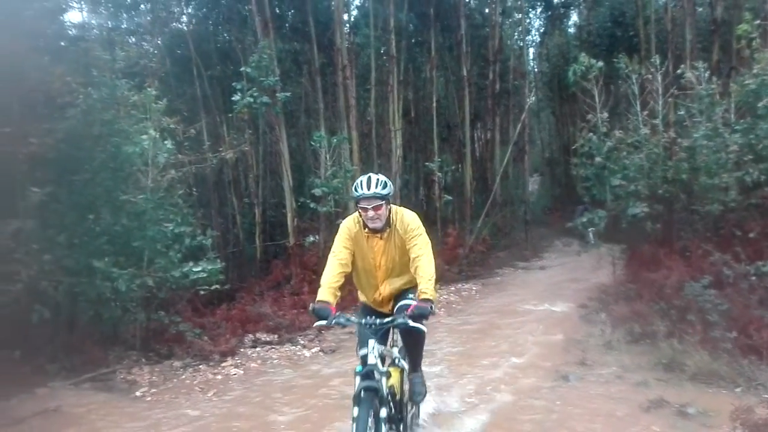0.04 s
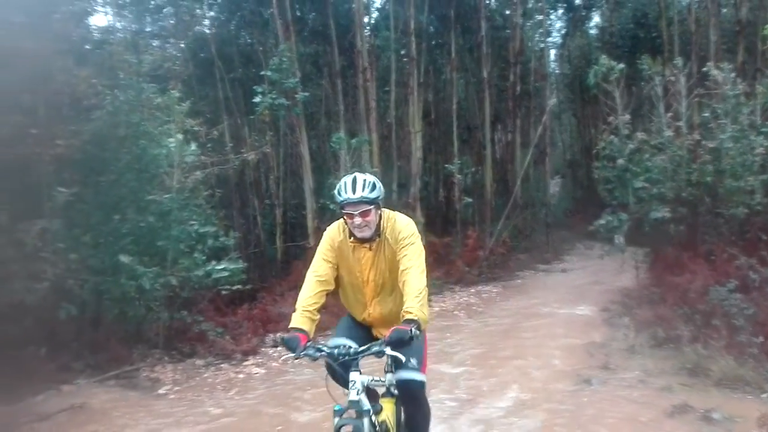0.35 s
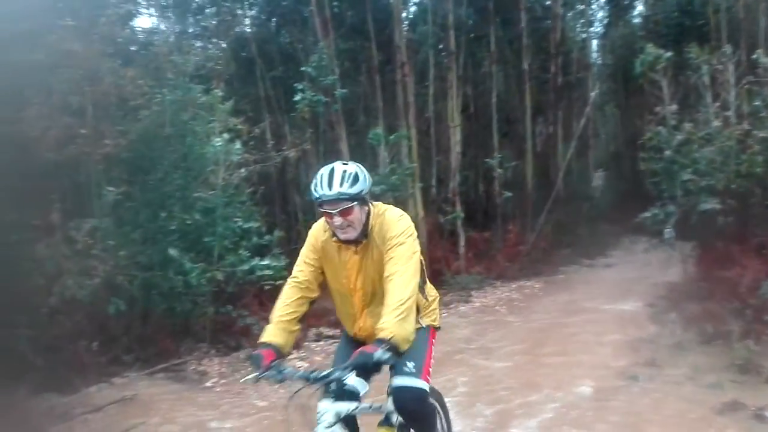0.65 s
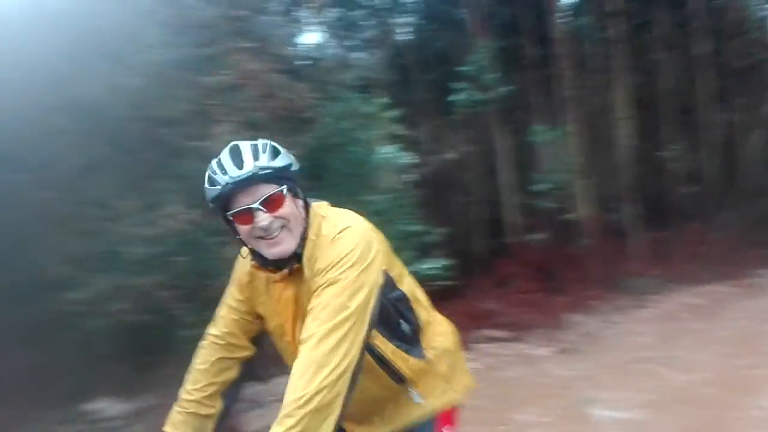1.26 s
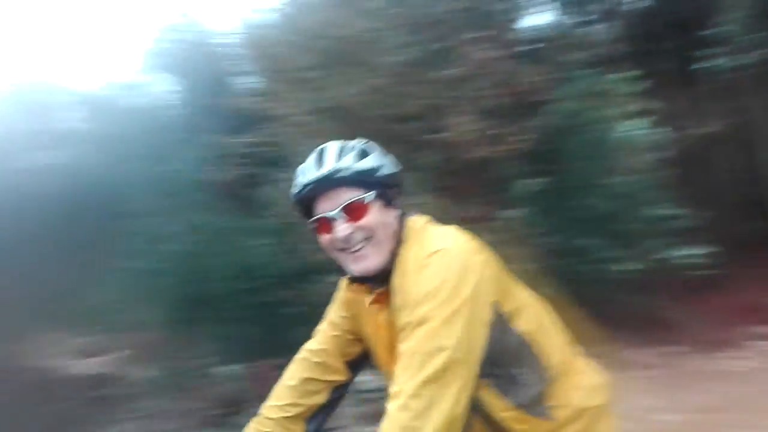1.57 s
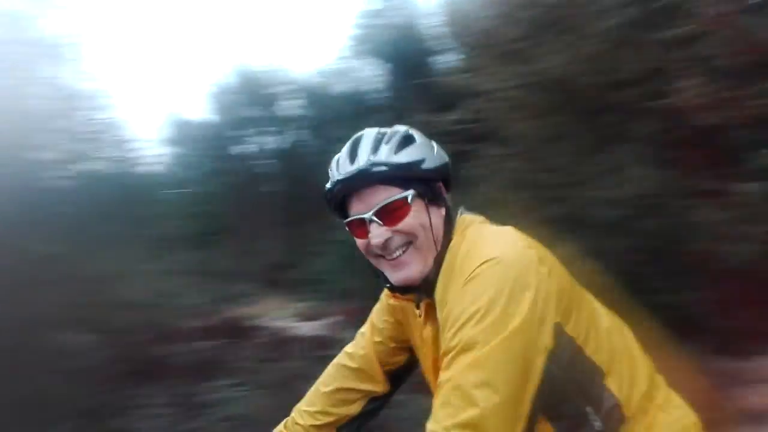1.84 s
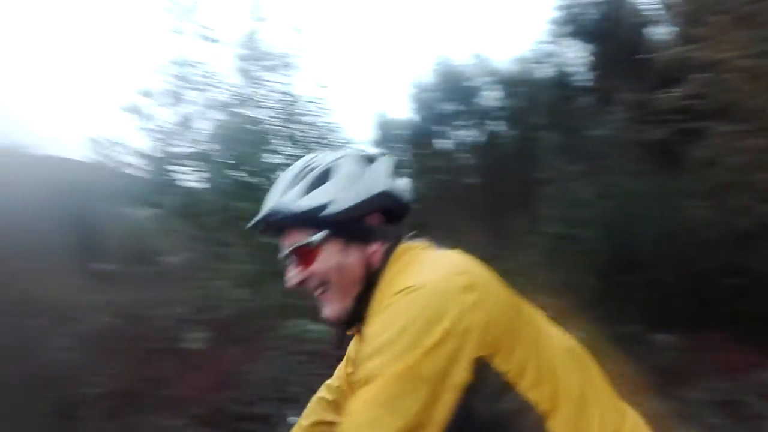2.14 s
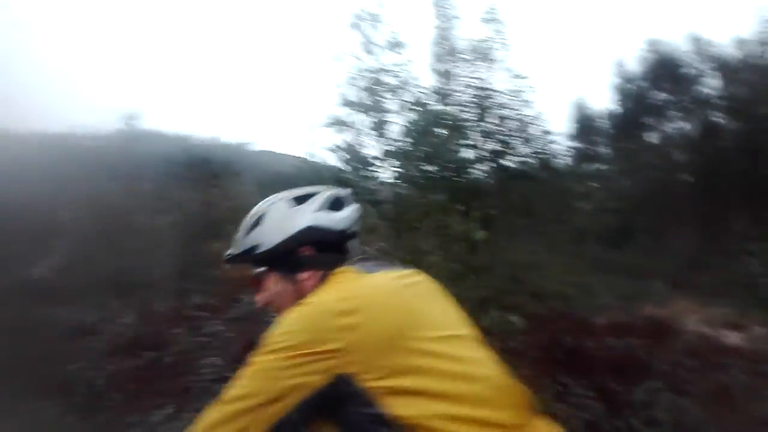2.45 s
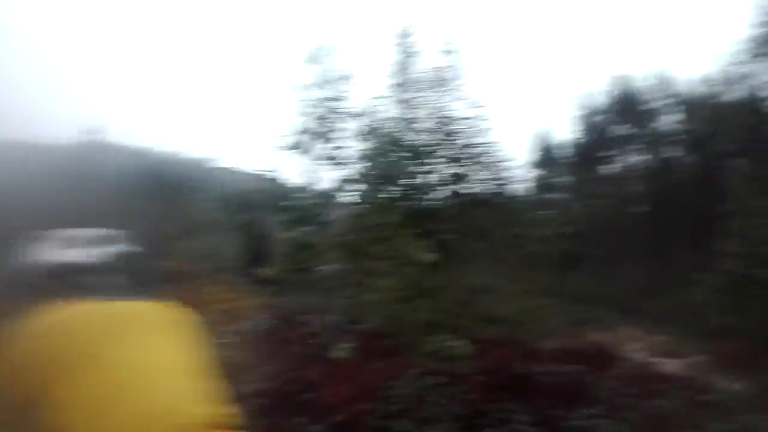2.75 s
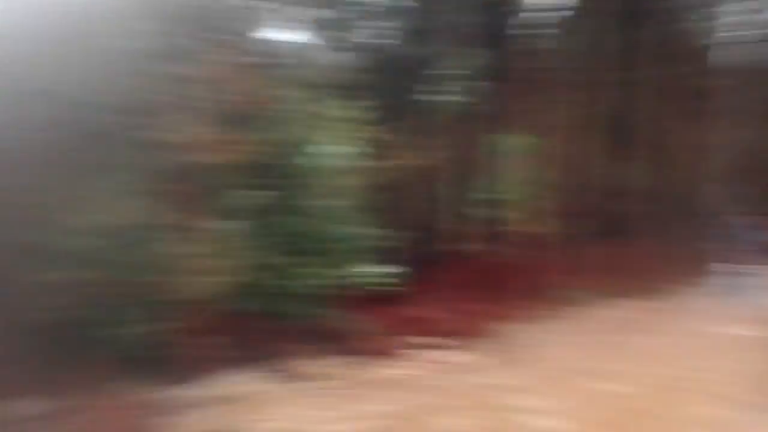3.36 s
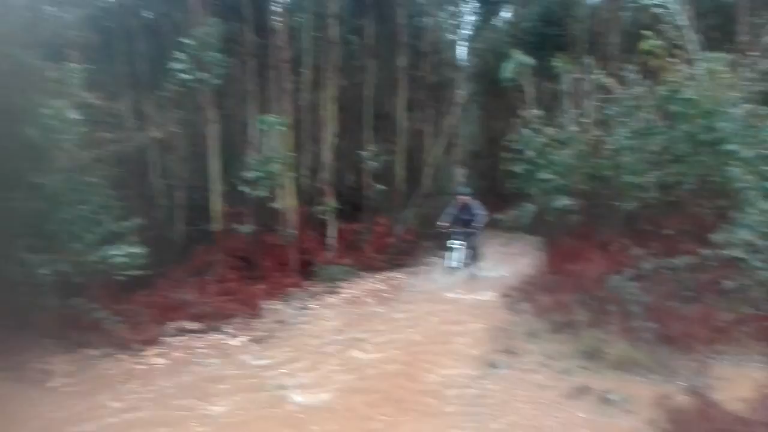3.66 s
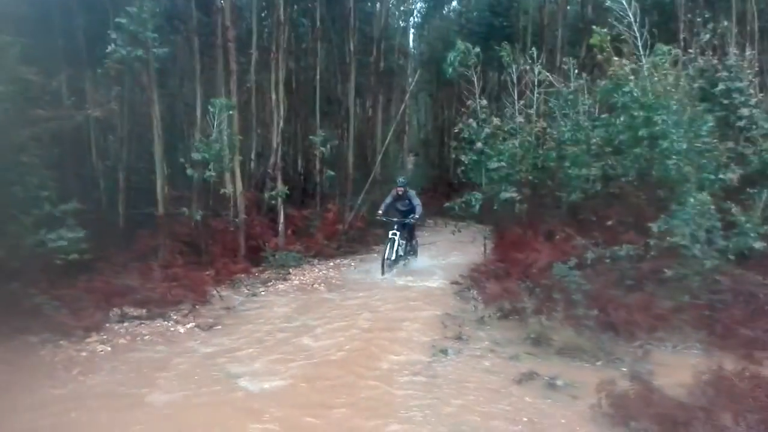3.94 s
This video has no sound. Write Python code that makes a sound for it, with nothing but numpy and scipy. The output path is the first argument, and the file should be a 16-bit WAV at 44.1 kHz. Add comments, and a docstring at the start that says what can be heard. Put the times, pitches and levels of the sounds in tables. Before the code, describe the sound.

A mountain bike rolls closer on a wet forest track, tyres crunching and hissing, with small squelches and splashes of mud. It is loudest from about 1.4 to 2.9 seconds, with a low rumble as it passes, and fades by 3.5. Dull knocks bump the microphone throughout, and a few loud, sharp clicks hit at around 3.2 to 3.4 seconds. Light wind rumble and soft forest ambience continue underneath.

```python
"""Mountain bike on a muddy track

A bike rolls close past a hand-held camera in a wet forest. Its tyres crunch through grit, hiss
and squelch, throwing fine spray when nearest, then rumble away. Soft bumps and a few sharp
clicks knock on the camera, over forest wash and light wind on the microphone."""
import sys
import numpy as np
from scipy import signal
from scipy.fft import rfft, irfft, next_fast_len
from scipy.io import wavfile
from scipy.ndimage import uniform_filter1d, map_coordinates

SR = 44100
rng = np.random.default_rng(int(sys.argv[2]) if len(sys.argv) > 2 else 0)


def digitize_waveform(pressure):
    """Quantize a signal to 16-bit integers and store it at the path in sys.argv[1].

    Rows of a 2-D input are taken as channels; values are limited to [-1, 1].
    """
    field = np.atleast_2d(pressure).T
    bounded = np.clip(field, -1, 1)
    quanta = np.round(bounded * 32767).astype(np.int16)
    wavfile.write(sys.argv[1], SR, quanta)


N = 176400
TIME_S = np.arange(N) / SR


def amp(db):
    """Decibels to gain."""
    return 10 ** (np.asarray(db) / 20)


def unit(x):
    """Scaled to rms 1."""
    return x / np.sqrt(np.mean(x ** 2) + 1e-20)


def along(points, hz):
    """A curve read on a log frequency axis."""
    freqs, values = np.transpose(points)
    return np.interp(np.log(hz + 1), np.log(freqs + 1), values)


def automation(rows):
    """One value per sample for each column after the time."""
    times, *columns = np.transpose(rows)
    return [np.interp(TIME_S, times, column) for column in columns]


def wobble(rate_hz):
    """A smooth curve through rate_hz random points a second."""
    return map_coordinates(rng.standard_normal(2048), [np.arange(N) * rate_hz / SR], mode="wrap")


def filtered(x, response):
    """x through an EQ given as gain against frequency."""
    size = next_fast_len(N + SR // 2)
    return irfft(rfft(x, size) * response(np.fft.rfftfreq(size, 1 / SR)), size)[..., :N]


def noise(patchy_db):
    """Two unrelated noises with brief patches of random gain."""
    spectra = signal.stft(rng.standard_normal((2, N)), nperseg=256)[2]
    patches = uniform_filter1d(rng.standard_normal(spectra.shape[1:]), size=6, axis=0)
    patches = unit(uniform_filter1d(patches, size=5, axis=1))
    return unit(signal.istft(spectra * amp(patchy_db * patches), nperseg=256)[1][:, :N])


def grains(count, low_hz, high_hz, cycles, spread_db):
    """Two unrelated streams of tiny damped rings: grit and bursting films of water."""
    t, out = np.arange(256) / SR, []
    for when, pitch, size, phase in rng.random((2, 4, count, 1)):
        hz = low_hz + (high_hz - low_hz) * pitch
        gain = amp(-spread_db * np.log(np.maximum(size, .004))) * np.sqrt(hz)
        rings = gain * np.sin(2 * np.pi * (hz * t + phase)) * np.exp(-np.log(1000) * hz * t / cycles)
        at = (when * N).astype(int) + np.arange(len(t))
        out.append(np.bincount(at.ravel(), rings.ravel(), N)[:N])
    return unit(np.array(out))


# Stereo image: freq_hz, left_right_correlation
STEREO_IMAGE = [(3400, 1), (3900, 1), (4600, 1), (5600, 0.84), (7500, .56), (13000, .4)]
MONO_BELOW_HZ = STEREO_IMAGE[0][0]


def coloured(pair, eq):
    """EQ two signals into stereo, mid at rms 1: mono in the bass, wide in the treble."""
    def response(hz):
        width = np.tan(np.arccos(along(STEREO_IMAGE, hz)) / 2) * (hz > MONO_BELOW_HZ)
        return amp(along(eq, hz)) * [np.ones_like(hz), width]
    mid, side = filtered(pair, response)
    return np.array([mid + side, mid - side]) / np.std(mid)


def passing(peak_s, half_width_s):
    """Gain that swells and fades as the bike goes by."""
    return 1 / np.sqrt(1 + ((TIME_S - peak_s) / half_width_s) ** 4)


def spurt(peak_s, half_width_s):
    """Bell-shaped envelope of a burst of liquid."""
    return np.exp(-2 * ((TIME_S - peak_s) / half_width_s) ** 2)


# Gritty midrange: freq_hz, gain_db
CRUNCH_EQ = [(260, -27), (450, -30), (580, -17.5), (664, -12.5), (934, -7.5), (1050, -5), (1350, -2),
             (2580, -10.5), (3000, -14), (3900, -17), (6600, -120)]


def crunch(level_db, trim_db=1):
    """Grit grinds under the tread: rough noise dotted with tiny ticks."""
    bed = noise(patchy_db=-2.5)
    grit = grains(count=5000, low_hz=617, high_hz=3210, cycles=11.7, spread_db=2)
    gain = amp(level_db + trim_db + 1.03 * wobble(rate_hz=70))
    return gain * coloured(bed + amp(-11 + 1) * grit, CRUNCH_EQ)


# Wet sizzle with the bike ahead, then from alongside onward: freq_hz, gain_db
HISS_AHEAD_EQ = [(1410, -35), (2400, -7), (2590, -8), (2910, -0.5), (3210, -4), (4050, 0.5), (4670, -2.5),
                 (5260, -4), (6530, -4), (7580, -0.5), (10200, -9.5), (12700, -13.5), (14300, -17)]
HISS_ALONGSIDE_EQ = [(1410, -14), (2400, -12.5), (2610, -4.5), (4810, -0.5), (5840, -4), (7090, -0.5),
                     (9480, -10.5), (11400, -11.5), (13100, -15.5), (14300, -27.5)]


def hiss(level_db, trim_db=1.5, crossfade_s=0.81, half_width_s=0.53):
    """Water films burst under the tread; the hiss changes colour as the bike draws level."""
    bed = noise(patchy_db=1.9)
    bursts = grains(count=12000, low_hz=2210, high_hz=13600, cycles=6.3, spread_db=4)
    water = bed + amp(-11) * bursts
    blend = .5 + .5 * np.tanh((TIME_S - crossfade_s) / half_width_s)
    wet = blend * coloured(water, HISS_ALONGSIDE_EQ) + (1 - blend) * coloured(water, HISS_AHEAD_EQ)
    return amp(level_db + trim_db + 0.4 * wobble(rate_hz=200)) * wet


# Airy top end: freq_hz, gain_db
SPRAY_EQ = [(6000, -30), (9500, -3), (11200, 13), (14000, -3)]


def spray(ground_db):
    """The finest spray, heard while the bike is nearest."""
    gain = amp(-47.5 + ground_db + wobble(rate_hz=25)) * passing(peak_s=2.2, half_width_s=.62)
    return gain * coloured(noise(patchy_db=2), SPRAY_EQ)


# Low body of the tyres: freq_hz, gain_db
TREAD_EQ = [(70, -19), (150, -1.5), (250, 0.5), (380, 5.5), (520, -3.5), (900, -16), (2000, -60)]


def tread(ground_db):
    """The tread rumbles most from behind, just after the pass."""
    gain = amp(-43 + ground_db) * passing(peak_s=2.51, half_width_s=0.59)
    return gain * coloured(noise(patchy_db=-0.8), TREAD_EQ)


# Fader moves of the pass, before trims: time_s, crunch_db, hiss_db
TYRE_FADERS = [(0.0, -44, -41), (0.2, -42, -40.5), (0.54, -38, -37.5), (0.82, -39, -37),
               (0.93, -33.5, -35.5), (1.01, -38.5, -34.0), (1.09, -33.5, -34.5), (1.29, -37.5, -35.5),
               (1.42, -30.5, -29), (1.5, -34, -32.5), (1.62, -32, -30.5), (1.96, -30.5, -28.5),
               (2.2, -32, -30), (2.4, -29.5, -28.5), (2.56, -31.5, -29), (2.84, -31, -32),
               (2.92, -35, -36.5), (3.12, -36.0, -37.5), (3.42, -42, -45), (3.6, -46.5, -57),
               (3.98, -46.5, -52.5)]


def tyres():
    """Rolling tyres; uneven ground shakes all four layers together."""
    crunch_db, hiss_db = automation(TYRE_FADERS)
    ground_db = .6 * wobble(rate_hz=40)
    contact = crunch(crunch_db + ground_db) + hiss(hiss_db + ground_db)
    return contact + spray(ground_db) + tread(ground_db)


# Ambience bed: freq_hz, gain_db
FOREST_EQ = [(110, -27), (180, -36), (290, -3.5), (403, -9), (433, -8), (493, -5.5), (685, -3), (853, -4),
             (1040, 1), (1840, -6.5), (2860, -13.5), (3130, -7), (5320, -25), (7000, -6), (11300, -25),
             (14300, -41)]


def forest():
    """The soft, steady wash of the forest."""
    return amp(-43.5 + 0.31 * wobble(rate_hz=10)) * coloured(noise(patchy_db=2.7), FOREST_EQ)


# Wind rumble and the sub-bass buffeting under it: freq_hz, gain_db
RUMBLE_EQ = [(12, -25), (20, 1), (32, -5.5), (59, 0.5), (144, 0.5), (199, -10), (260, -13), (340, -42),
             (570, -120)]
BUFFET_EQ = [(6, -10), (14, -2.5), (32, -13), (70, -19), (200, -60)]
# Gusts: time_s, rumble_offset_db, buffet_db
WIND_FADERS = [(0, -2.5, -47), (.8, -1, -45), (1.7, 2.5, -44), (2.2, -7, -47.5), (3.3, -1, -50),
               (3.65, -16, -36), (4, -4.5, -44.5)]


def wind():
    """A light breeze rumbles and buffets on the microphone."""
    offset_db, buffet_db = automation(WIND_FADERS)
    rumble_gain = amp(-42.5 + offset_db + 1.6 * wobble(rate_hz=11))
    rumble = coloured(noise(patchy_db=0.7), RUMBLE_EQ)
    top_hz = BUFFET_EQ[-1][0]
    buffet = filtered(rng.standard_normal(N), lambda hz: amp(along(BUFFET_EQ, hz)) * (hz < top_hz))
    return rumble_gain * rumble + amp(buffet_db) * unit(buffet)


def ring(t, hz, t60_s):
    """A damped sine."""
    return np.sin(2 * np.pi * hz * t) * np.exp(-np.log(1000) * t / t60_s)


# Dull knocks on the camera: start_s, peak_db, pitch_hz, t60_s, thud_mix_db
BUMP_CUES = [(0.0556, -24.5, 240, 0.012, -21), (0.085, -20, 195, 0.012, -11), (.605, -19, 195, .02, -1),
             (.637, -26.5, 236, 0.025, -24), (.921, -24.5, 190, 0.012, -10), (1.068, -27, 225, 0.019, -10),
             (1.498, -27.5, 300, 0.022, -17), (1.541, -22.5, 220, 0.016, -13),
             (1.715, -28, 180, 0.022, -12), (1.7763, -12, 333, 0.02, -45), (2.478, -27, 365, .025, -25),
             (2.52, -26, 220, 0.017, -15), (2.7052, -22.5, 245, 0.012, -11), (2.828, -31, 327, 0.021, -31),
             (3.112, -26, 242, 0.022, -4), (3.279, -31, 263, 0.018, -26), (3.3564, -14, 253, 0.013, -18),
             (3.798, -33, 264, 0.018, -17), (3.825, -24, 254, 0.01, -11)]


def bumps(attack_s=0.00084):
    """Each knock gives a dull ring of a few cycles over a deeper thud; hard ones have an edge."""
    out, t = np.zeros(N + SR), np.arange(SR // 8) / SR
    for start_s, peak_db, pitch_hz, t60_s, thud_mix_db in BUMP_CUES:
        thud = amp(thud_mix_db) * ring(t, hz=119, t60_s=0.028)
        edge = amp(peak_db + 6) * ring(t, hz=860, t60_s=0.0097)
        knock = (ring(t, pitch_hz, t60_s) + thud + edge) * (1 - np.exp(-t / attack_s))
        out[round(start_s * SR):][:len(t)] += amp(peak_db) * knock / np.abs(knock).max()
    return out[:N]


# Flicks of thin mud: peak_s, level_db, half_width_s
SPLASH_CUES = [(0.3, -44, .06), (.545, -38, .04), (0.632, -29, .003), (1.428, -32, .014), (2.315, -28, .03),
               (2.812, -32, .035)]
# Droplet sparkle: freq_hz, gain_db
SPLASH_EQ = [(1800, -25), (3500, -4), (5500, -6), (7500, 3), (10000, -5.5), (14000, -11)]


def splashes():
    """Thin mud scatters in bright spurts of fine droplets."""
    flow = sum(amp(level_db) * spurt(peak_s, width_s) for peak_s, level_db, width_s in SPLASH_CUES)
    droplets = grains(count=12000, low_hz=3000, high_hz=12900, cycles=7.6, spread_db=1)
    return flow * coloured(droplets, SPLASH_EQ)


# Mud squelches: peak_s, level_db, pitch_hz, half_width_s
SQUELCH_CUES = [(.46, -35, 1590, 0.02), (0.67, -35, 1180, .025), (0.868, -36, 1230, .025),
                (1.435, -30.5, 1400, 0.022), (2.424, -26, 1420, 0.012)]


def squelches(band_ratio=0.31):
    """A tyre presses into mud, squeezing out short, hollow spurts of water."""
    out = np.zeros(N)
    for peak_s, level_db, pitch_hz, half_width_s in SQUELCH_CUES:
        band = lambda hz: 1 / (1 + ((hz / pitch_hz - 1) / band_ratio) ** 2) ** 2
        hollow = unit(filtered(rng.standard_normal(N), band))
        out += amp(level_db) * hollow * spurt(peak_s, half_width_s)
    return out


def resonance(hz, pitch_hz, width_hz):
    """The response of one damped mode."""
    return 1j * hz * width_hz / (pitch_hz ** 2 - hz ** 2 + 1j * hz * width_hz)


# Ring of the camera's case: pitch_hz, width_hz, gain_db
CASE_MODES = [(1770, 760, -3.5), (3300, 1300, -4)]
# Clicks right at the microphone: start_s, peak_db, pitch_hz, case_mix_db, scrape_mix_db, side_mix_db
CLICK_CUES = [(3.2196, 5.5, 6060, 0.5, -30, -35), (3.2267, 1.5, 5800, -3, -38, -13),
              (3.2341, -2.5, 5360, 5, -16, -11), (3.3569, 2.5, 4630, -2, -44, -50)]


def clicks(scrape_t60_s=0.011):
    """Hard, dry ticks that briefly ring the camera's case; a short scrape follows each."""
    out, t = np.zeros((2, N + SR)), np.arange(2048) / SR
    hz = np.fft.rfftfreq(len(t), 1 / SR)
    case = sum(amp(db) * resonance(hz, pitch_hz, width_hz) for pitch_hz, width_hz, db in CASE_MODES)
    spread = 2j * np.sqrt(np.clip(1 - along(STEREO_IMAGE, hz), 0, 1)) * (hz > MONO_BELOW_HZ)
    gate = t < t[-1] / 2
    for start_s, peak_db, pitch_hz, case_mix_db, scrape_mix_db, side_mix_db in CLICK_CUES:
        scrape = rng.standard_normal(len(t)) * np.exp(-np.log(1000) * t / scrape_t60_s)
        contact = rfft((t == 0) + amp(scrape_mix_db) * scrape)
        tick = resonance(hz, pitch_hz, width_hz=1500)
        mid = irfft(contact * (tick + amp(case_mix_db) * case))
        side = amp(side_mix_db) * irfft(contact * tick * spread)
        click = np.array([mid + side, mid - side]) * gate / np.abs(mid).max()
        out[:, round(start_s * SR):][:, :len(t)] += amp(peak_db) * click
    return out[:, :N]


def scene():
    """The bike, the knocks and the open air."""
    return tyres() + squelches() + splashes() + bumps() + clicks() + forest() + wind()


def record(dry):
    """Hard clipping at full scale, then a brick-wall low-pass."""
    return filtered(np.clip(dry, -1, 1), lambda hz: hz < 14400)


dry = scene()
out = record(dry)
digitize_waveform(out)
```